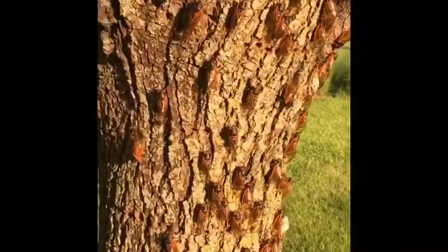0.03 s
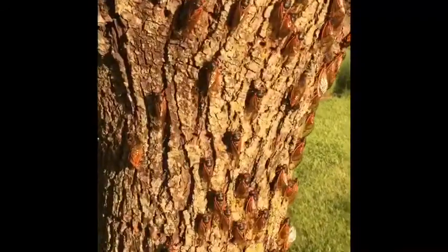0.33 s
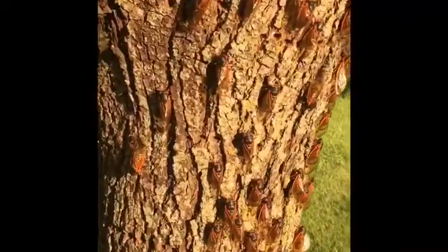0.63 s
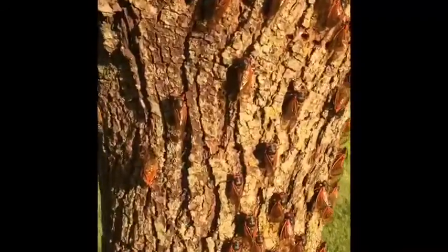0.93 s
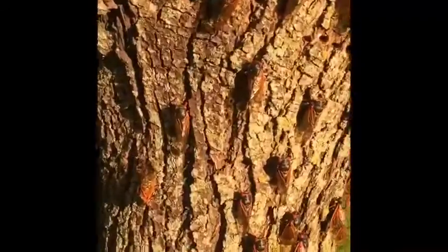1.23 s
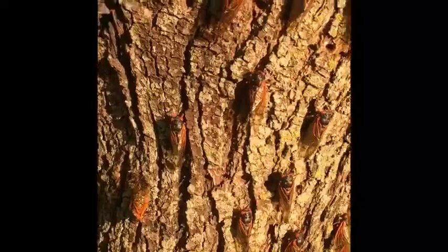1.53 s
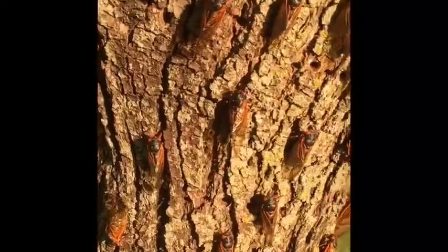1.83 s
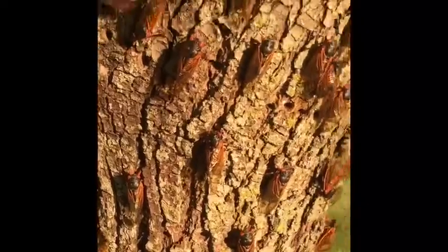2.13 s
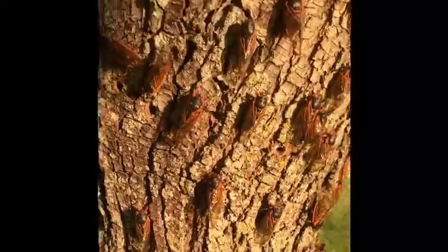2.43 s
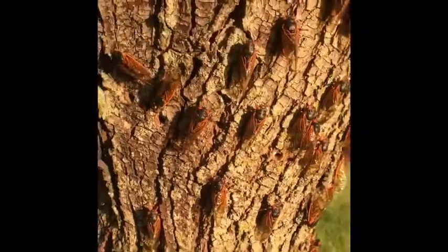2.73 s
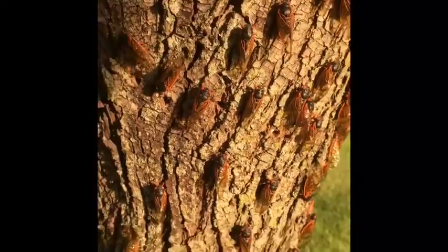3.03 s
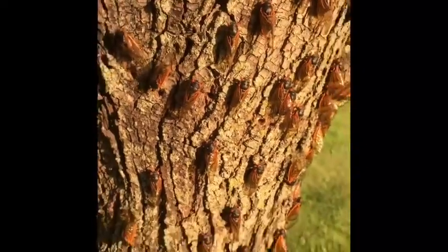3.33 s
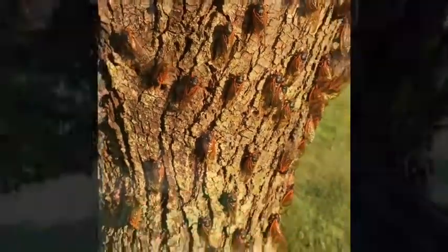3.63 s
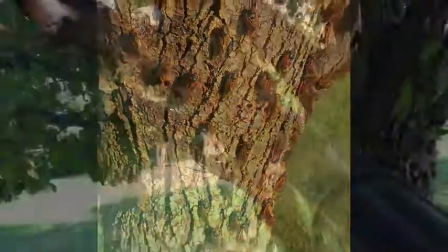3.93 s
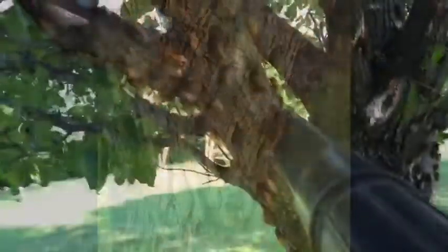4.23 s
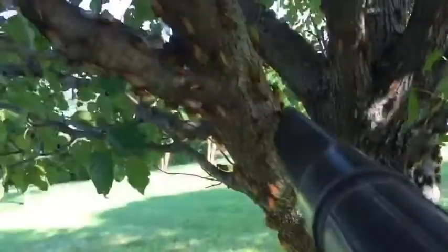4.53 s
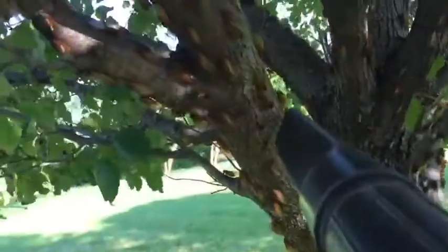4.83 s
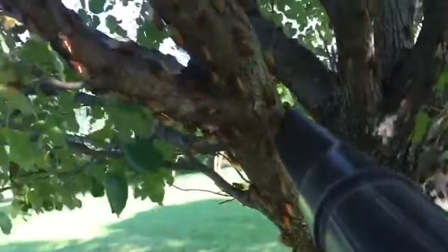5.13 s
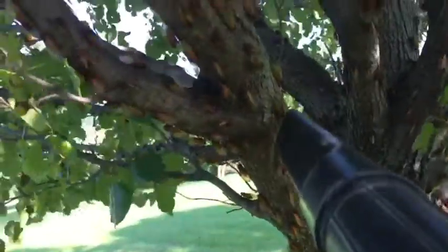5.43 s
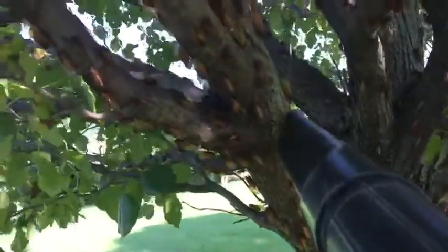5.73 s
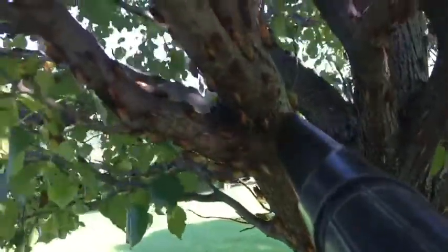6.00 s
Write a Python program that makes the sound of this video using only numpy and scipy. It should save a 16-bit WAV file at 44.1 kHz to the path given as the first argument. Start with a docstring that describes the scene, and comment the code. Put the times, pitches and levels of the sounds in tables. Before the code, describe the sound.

Quiet, rapid cicada chirps and light wind give way to a loud rushing vacuum whose nozzle chokes, whistles and clicks on debris.

```python
"""A far cicada chorus hisses, a breeze rumbles on the microphone and a bird peeps faintly.
A near cicada chirps about five times a second, its tymbal ribs buckling and ringing its hollow body;
neighbours tick and buzz. From 3.5 s a shop vacuum takes over: air rushes through its plastic nozzle
over the motor's whine and hum. Insects and bark choke the mouth, which hisses and whistles,
and they rattle away down the tube. The sound is mono."""
import sys
import numpy as np
from scipy import signal
from scipy.fft import rfft, irfft, next_fast_len
from scipy.io import wavfile
from scipy.ndimage import map_coordinates

SR = 44100
rng = np.random.default_rng(int(sys.argv[2]) if len(sys.argv) > 2 else 0)


def master(y):
    """Save y as 16-bit WAV."""
    cut = np.clip(np.atleast_2d(y).T, -1, 1)
    pcm = np.round(cut * 32767)  # scale
    wavfile.write(sys.argv[1], SR, pcm.astype(np.int16))


N = 267466
TIME = np.arange(N) / SR


def amp(db):
    """Decibels to gain."""
    return 10 ** (np.asarray(db) / 20)


def unit(x):
    """Scaled to rms 1."""
    return x / np.sqrt(np.mean(x ** 2) + 1e-20)


def curves(rows):
    """One value per sample for each column after the time."""
    times_s, *columns = np.transpose(rows)
    return [np.interp(TIME, times_s, column) for column in columns]


def wobble(rate_hz):
    """Smooth random curve, rate_hz knots a second."""
    return map_coordinates(rng.standard_normal(int(N * rate_hz / SR) + 4), [TIME * rate_hz])


def filtered(x, response):
    """Applies a complex frequency response."""
    size = next_fast_len(len(x) + 8192)
    return irfft(rfft(x, size) * response(np.fft.rfftfreq(size, 1 / SR)), size)[:len(x)]


def colour(points):
    """Response through (Hz, dB) points on a log axis."""
    points_hz, db = np.transpose(points)
    return lambda hz: amp(np.interp(np.log(hz + 1), np.log(points_hz + 1), db))


def resonances(modes):
    """Response of (Hz, width Hz, dB) modes, alternating in sign."""
    return lambda f: sum((-1) ** k * amp(db) * 1j * f * width / (hz * hz - f * f + 1j * f * width)
                         for k, (hz, width, db) in enumerate(modes))


def causal(response, size=2048):
    """Minimum-phase impulse response: nothing rings before it is struck."""
    cepstrum = irfft(np.log(np.abs(response(np.fft.rfftfreq(size, 1 / SR))) + 1e-6))
    cepstrum[1:size // 2] *= 2
    cepstrum[size // 2 + 1:] = 0
    return irfft(np.exp(rfft(cepstrum)))[:size // 4]


def noise(response):
    """Coloured noise of rms 1."""
    return unit(filtered(rng.standard_normal(N), response))


def band_noise(hz, width_hz):
    """Noise passed twice through one resonance."""
    return noise(lambda f: resonances([(hz, width_hz, 0)])(f) ** 2)


def add(track, start_s, sound):
    """Mixes a sound into the track."""
    start = int(np.clip(round(start_s * SR), 0, N))
    track[start:start + len(sound)] += sound[:N - start]


def gate(t, length_s, attack_s, release_s):
    """Opens at t = 0, holds, dies away."""
    return (1 - np.exp(-t / attack_s)) * np.exp(-np.maximum(t - length_s, 0) / release_s)


def swells(rows, sigma_s):
    """A bell-shaped bump of gain at each (s, dB)."""
    return sum(amp(db) * np.exp(-.5 * ((TIME - centre_s) / sigma_s) ** 2) for centre_s, db in rows)


def glides(notes, hoarse, fade_db=-3):
    """Breathy sliding tones; hoarse sets bandwidth as a share of pitch."""
    out, t = np.zeros(N), np.arange(SR // 4) / SR
    for start_s, length_s, db, first_hz, target_hz, slide_s in notes:
        hz = target_hz + (first_hz - target_hz) * np.exp(-t / slide_s)
        narrow = lambda f: 1 / (1 + 1j * f / (hoarse * target_hz)) ** 1.67
        real, imaginary = (unit(filtered(rng.standard_normal(len(t)), narrow)) for _ in range(2))
        tone = np.real((real + 1j * imaginary) * np.exp(2j * np.pi * np.cumsum(hz) / SR))
        add(out, start_s, amp(db + fade_db * t / length_s) * gate(t, length_s, .00044, .0088) * tone)
    return out


def ticks(rows, spectrum, gain_db, decay_s):
    """A fast-dying puff of coloured noise at each (s, dB)."""
    out, t = np.zeros(N), np.arange(SR // 40) / SR
    for start_s, db in rows:
        puff = unit(filtered(rng.standard_normal(len(t)), colour(spectrum)))
        add(out, start_s, amp(db + gain_db) * np.exp(-t / decay_s) * puff)
    return out


# Chorus loudness. Each row: time in seconds, hiss level in dB, drone level in dB.
CHORUS_LEVELS = [(0.0, -60.5, -67), (0.21, -61.5, -67), (0.52, -61, -61), (0.7, -60.5, -52),
                 (1.08, -58.5, -73), (2.12, -57, -67.5), (2.33, -56.5, -55), (3.41, -56.5, -58.5),
                 (3.45, -56, -53)]
# Its hiss. Each row: frequency in Hz, gain in dB.
CHORUS_SPECTRUM = [(530, 2), (900, -8.5), (1480, -3), (2150, -4.5), (3400, -4), (4730, -4.5), (5510, -3.5),
                   (7320, -6), (8130, -11.5), (15000, -22.5)]

def chorus():
    """Countless far cicadas merge into a hiss and a fluttering drone."""
    hiss_db, drone_db = curves(CHORUS_LEVELS)
    hiss = amp(hiss_db + 2 + .43 * wobble(20)) * noise(colour(CHORUS_SPECTRUM))
    drone = band_noise(hz=6600, width_hz=1100)
    return hiss + amp(drone_db - 4 + 6 * wobble(45)) * drone


# Breeze strength and single eddies. Each row: time in seconds, level in dB.
BREEZE_LEVELS = [(0.0, -38.5), (0.37, -46.5), (0.43, -50.5), (0.92, -46), (1.01, -67), (1.18, -55),
                 (1.22, -51.5), (1.53, -43.5), (1.57, -61), (1.63, -42.5), (1.74, -48), (1.8, -43),
                 (1.98, -51), (2.31, -39), (2.36, -50), (2.43, -43.5), (2.9, -49.5), (2.93, -71),
                 (2.97, -49), (3.16, -58), (3.22, -47), (3.29, -58), (3.48, -54)]
BREEZE_EDDIES = [(0.074, -33), (0.26, -36), (0.318, -35), (0.699, -44.5), (0.874, -39), (0.926, -37),
                 (1.387, -41), (1.469, -44), (1.659, -39.5), (1.797, -34), (2.208, -32), (2.292, -33),
                 (2.619, -39)]
# Their spectra. Each row: frequency in Hz, gain in dB.
BREEZE_SPECTRUM = [(20, -20), (45, -8.5), (80, 2.5), (150, 0.5), (300, -9), (600, -22), (1100, -41),
                   (2000, -56)]
EDDY_SPECTRUM = [(60, -16), (160, 10), (320, 5), (600, -2.5), (1000, -20), (2000, -50)]

def breeze():
    """Moving air rumbles on the microphone; single eddies flutter higher up."""
    rumble_db = curves(BREEZE_LEVELS)[0] - 1 + 5 * np.tanh(wobble(45))
    rumble = amp(rumble_db) * noise(colour(BREEZE_SPECTRUM))
    eddy_gain = swells(BREEZE_EDDIES, sigma_s=.013) * amp(-6 + 4 * np.tanh(wobble(90)))
    return rumble + eddy_gain * noise(colour(EDDY_SPECTRUM))


# Bird notes. Each row: start and length in seconds, level in dB, first and target pitch in Hz,
# slide time constant in seconds.
BIRD_NOTES = [(.03, 0.068, -66, 7400, 8100, 0.072), (1.015, .035, -60, 7100, 7800, 0.033)]

def far_bird():
    """A far bird peeps thin rising notes."""
    return glides(BIRD_NOTES, hoarse=.008)


def tymbal(body, rib_gap_s=.00064, rib_count=6):
    """One click of energy 1: ribs buckle in turn and ring the hollow body."""
    t = np.arange(SR // 50) / SR
    push = .075 * rng.standard_normal(len(t)) * np.exp(-t / .005)
    ribs = np.arange(rib_count)
    buckle_s = np.abs(ribs + rng.normal(0, .15, rib_count)) * rib_gap_s
    push[(buckle_s * SR).astype(int)] += amp(-2.2 * np.abs(ribs - 1))  # second rib loudest
    click = np.convolve(push, body)
    return click / np.linalg.norm(click)


# Near chirps. Each row: start in seconds, level in dB, click period and weak-click delay in seconds.
CICADA_CHIRPS = [(0.1812, -35.5, 0.0047, 0.044), (0.4316, -34, 0.0043, 0.036),
                 (0.8279, -32.5, 0.0057, 0.052), (1.07, -31.5, 0.0052, 0.047), (1.297, -32, 0.0055, 0.048),
                 (1.484, -33, 0.0055, 0.038), (1.7004, -32, 0.0046, 0.049), (1.8904, -30, 0.0058, 0.046),
                 (2.1029, -30, 0.0058, 0.052), (2.3126, -30.5, 0.006, 0.044),
                 (2.5296, -32.5, 0.0052, 0.047), (2.7245, -32, 0.0062, 0.049), (2.9452, -31, 0.0055, 0.054),
                 (3.1636, -34, 0.0061, 0.047), (3.3724, -34, 0.0051, 0.047)]
# The five clicks of a chirp. Each entry: gain in dB.
CLICK_GAINS_DB = [-8, -2, -3.5, -0.5, -3.5]
# Abdomen resonances. Each row: centre in Hz, width in Hz, gain in dB.
ABDOMEN_MODES = [(4570, 590, -8.5), (6050, 570, -4.5), (6530, 290, 1), (8980, 1300, -22.5)]

def near_cicada(gain_db=20.5, weak_db=-11, fade_db=2):
    """Each chirp is five clicks; four weaker, duller ones follow as the tymbals relax."""
    out = np.zeros(N)
    crack = colour([(1000, -20), (3000, -6), (9000, -6.5), (15000, -15)])
    band = lambda hz: 1 / (1 + (3600 / (hz + 1)) ** 8) / (1 + (hz / 11500) ** 6)
    body = causal(lambda hz: np.abs(resonances(ABDOMEN_MODES)(hz)) * band(hz) + amp(-32) * crack(hz))
    dull = causal(colour([(2500, -31), (4300, 1.5), (5500, 6), (6700, 1.5), (8000, -8.5), (13000, -27)]))
    for start_s, db, period_s, delay_s in CICADA_CHIRPS:
        for k, click_db in enumerate(CLICK_GAINS_DB):
            click_s = start_s + k * period_s + rng.normal(0, .0002)
            add(out, click_s, amp(db + gain_db + click_db + rng.normal(0, 1)) * tymbal(body))
        for k in range(4):
            click_s = start_s + delay_s + k * period_s + rng.normal(0, .00046)
            add(out, click_s, amp(db + gain_db + weak_db - fade_db * k) * tymbal(dull))
    return out


# Snaps. Each row: start in seconds, level in dB.
CHIRP_SNAPS = [(.184, -38.5), (1.304, -44), (2.121, -38), (2.533, -42)]
# Their spectrum. Each row: frequency in Hz, gain in dB.
SNAP_SPECTRUM = [(800, -12), (2400, 1), (4500, 4), (9000, -5), (15000, -13)]

def snaps():
    """A dry snap sounds within some chirps."""
    return ticks(CHIRP_SNAPS, SNAP_SPECTRUM, gain_db=-2, decay_s=.0027)


# Neighbours' calls. Each row: start and length in seconds, level and swell in dB, click rate in Hz.
NEIGHBOUR_BUZZES = [(.339, .005, -42.5, 1, 200), (.566, .206, -38.5, 4, 480), (0.668, .015, -43.5, -5, 190),
                    (0.942, .012, -56, 7, 170), (1.042, .012, -52, 2, 190), (1.509, 0.036, -57, -8, 320),
                    (1.603, .034, -43, 0, 156), (1.831, .005, -55.5, -4, 210), (2.423, .005, -49, 1, 190),
                    (2.678, .005, -53.5, -4, 190), (3.454, .005, -48, 2, 220)]
# Their body response. Each row: frequency in Hz, gain in dB.
NEIGHBOUR_SPECTRUM = [(1760, -62), (3000, -38), (3830, -29), (4190, -11), (4360, -7), (4900, -7),
                      (6420, 0.5), (6800, -1), (8150, -14.5), (9150, -15), (12100, -32), (14000, -33)]

def neighbours():
    """Other cicadas on the trunk tick or run their clicks together into a buzz."""
    out, body = np.zeros(N), causal(colour(NEIGHBOUR_SPECTRUM))
    for start_s, length_s, db, swell_db, rate_hz in NEIGHBOUR_BUZZES:
        for t in np.arange(0, length_s, 1 / rate_hz):
            gain = amp(db + swell_db * (t / length_s - 1.5) + rng.normal(0, .68)) * np.sqrt(SR / rate_hz)
            add(out, start_s + t + rng.normal(0, .00039), gain * tymbal(body))
    return out


def garden(calls, t60_s=.068, wet_db=-16):
    """Branches and ground scatter a short, weak tail."""
    t = np.arange(SR // 3) / SR
    tail = rng.standard_normal(len(t)) * amp(-60 * t / t60_s) * (1 - np.exp(-t / .0039))
    return calls + amp(wet_db) * signal.fftconvolve(calls, tail / np.linalg.norm(tail))[:N]


# Vacuum airflow. Each row: time in seconds, tube rush level in dB, mouth hiss level in dB.
FLOW_LEVELS = [(3.5, -48, -37), (3.59, -44.5, -39), (3.74, -37.5, -29.5), (3.86, -35, -26.5),
               (4.3, -32.5, -24.5), (4.38, -30, -29), (4.75, -29, -24.5), (5.08, -27, -27),
               (5.22, -29, -24.5), (5.37, -29.5, -27), (6.06, -27, -24.5)]
# Resonances of the short end piece and long tube. Each row: centre and nominal width in Hz, gain in dB.
NOZZLE_MODES = [(1313, 190, 2.5), (1960, 170, 2), (2480, 120, -2), (3060, 250, -1), (3640, 740, -1)]
TUBE_MODES = [(333, 102, 0), (582, 88, 1.5), (993, 78, -1), (1213, 120, 1), (1403, 157, 5),
              (1954, 173, 4.5), (2144, 154, 1), (2600, 200, -2.5), (2900, 320, -4), (3640, 340, -7)]
# Mouth hiss. Each row: frequency in Hz, gain in dB.
MOUTH_SPECTRUM = [(400, 2), (2500, -0.5), (4200, 0), (4900, -1), (5800, 0.5), (8000, -1.5), (9300, 0),
                  (10400, -3.5), (11500, -1), (15000, -2)]

def suction():
    """Steady flow sounds the resonances of nozzle and tube and hisses at the mouth."""
    rush_db, mouth_db = curves(FLOW_LEVELS)
    # each resonance flutters on its own as the flow shifts
    nozzle = unit(sum(amp(db - .5 * wobble(22.15)) * np.sqrt(width_hz) * band_noise(hz, 1.5 * width_hz)
                      for hz, width_hz, db in NOZZLE_MODES))
    turn_rad = np.interp(TIME, [4.1, 4.9], [.45, np.pi / 2])  # nozzle swings away, tube takes over
    tube = noise(resonances(TUBE_MODES))
    hollow = amp(1.5) * np.sin(turn_rad) * tube + amp(5) * np.cos(turn_rad) * nozzle
    rush = amp(rush_db + .5 * wobble(28)) * hollow
    hiss = amp(mouth_db + .65 * wobble(60)) * noise(colour(MOUTH_SPECTRUM))
    return rush + hiss


# Draught strength and eddies from the nozzle. Each row: time in seconds, level in dB.
DRAUGHT_LEVELS = [(3.5, -51), (3.58, -40.5), (3.92, -32.5), (4.06, -23), (4.11, -30.5), (4.17, -19.5),
                  (4.22, -48), (4.27, -24.5), (4.42, -35), (4.48, -16.5), (4.53, -27), (4.93, -27.5),
                  (4.98, -18.5), (5.05, -38), (5.12, -24), (5.31, -39), (5.47, -27), (5.75, -36),
                  (5.85, -26.5), (6.06, -35)]
NOZZLE_EDDIES = [(4.049, -23), (4.689, -19), (4.958, -19), (5.479, -20), (5.589, -14.5)]
# Their spectrum. Each row: frequency in Hz, gain in dB.
DRAUGHT_SPECTRUM = [(13, -47), (22, -33), (50, -4), (69, 2.5), (167, -3.5), (228, -8.5), (462, -22.5),
                    (500, -35.5), (650, -16), (1100, -120)]

def draught():
    """Air drawn past the microphone rumbles and thumps on it."""
    rumble_gain = amp(curves(DRAUGHT_LEVELS)[0] - 2.5 + 2.5 * np.tanh(wobble(30)))
    thump_gain = amp(-9) * swells(NOZZLE_EDDIES, sigma_s=.0088)
    return (rumble_gain + thump_gain) * noise(colour(DRAUGHT_SPECTRUM))


# Hum and whine. Each row: frequency in Hz, relative level in dB.
MOTOR_TONES = [(65, -9.5), (164, -10.5), (560, -15), (1008, -26), (2270, -8), (2676, -28)]

def motor(speed_drift=.000746, waver_db=2):
    """The motor hums and the impeller whines, growing clearer as the nozzle turns."""
    drifted_s = np.cumsum(1 + speed_drift * wobble(8)) / SR
    tones = sum(amp(db + waver_db * wobble(27)) * np.sqrt(2) * np.sin(2 * np.pi * hz * drifted_s)
                for hz, db in MOTOR_TONES)
    rush_db = curves(FLOW_LEVELS)[0]
    return amp(rush_db + np.interp(TIME, [4.3, 5.0], [-8, 0])) * tones


# Blockages. Each row: start and length in seconds, jet level, roar level and level change in dB.
BLOCKAGES = [(4.202, 0.012, -10, -22, -8), (4.218, 0.047, -17.5, -22, -4),
             (4.269, 0.047, -28.5, -33.5, 4.5), (4.320, 0.079, -21.5, -26.5, 1.5),
             (4.399, 0.051, -22, -29.5, 8.5), (4.454, 0.087, -17.5, -17.5, 0), (4.610, 0.04, -22, -31, -5),
             (4.675, .14, -24, -31, 1), (5.022, 0.11, -14, -33, -7), (5.181, 0.0077, -16, -19.5, -3.5),
             (5.217, 0.18, -17.5, -17, -2), (5.697, 0.041, -12.5, -18, -6.5)]
# Jet and roar spectra. Each row: frequency in Hz, gain in dB.
JET_SPECTRUM = [(800, -4.5), (2000, -3.5), (3300, 5), (4900, 0.5), (7600, -1.5), (9300, 1.5), (10400, -2),
                (11800, 2.5), (15000, -1.5)]
ROAR_SPECTRUM = [(200, -25), (600, -3.5), (1300, 0), (2000, 1.5), (2600, -4), (4000, -6), (6500, -17),
                 (12000, -30)]

def chokes(rough_db=2.04, grit_db=3, pipe_hz=635, echo_gain=.095):
    """A partly blocked mouth makes a hissing jet; the load tumbling down the tube roars roughly."""
    jet_gain, roar_gain = np.zeros(N), np.zeros(N)
    t = np.arange(SR // 3) / SR
    for start_s, length_s, jet_db, roar_db, change_db in BLOCKAGES:
        shape = gate(t, length_s, .0019, .011) * amp(change_db * np.minimum(t / length_s, 1))
        add(jet_gain, start_s, amp(jet_db) * shape)
        add(roar_gain, start_s, amp(roar_db) * shape)
    tumble = unit(amp(rough_db * wobble(260)))
    # sound bouncing back and forth along the tube makes the roar hollow
    hollow = lambda hz: colour(ROAR_SPECTRUM)(hz) / (1 - echo_gain * np.exp(-2j * np.pi * hz / pipe_hz))
    grit = unit(filtered(amp(grit_db * wobble(900)) * rng.standard_normal(N), hollow))
    jet = jet_gain * np.sqrt(tumble) * noise(colour(JET_SPECTRUM))
    return jet + roar_gain * tumble * grit


# Gap whistles. Each row: start and length in seconds, level in dB, first and target pitch in Hz,
# slide time constant in seconds.
GAP_WHISTLES = [(4.205, 0.032, -18.5, 3590, 2905, .006), (4.232, 0.044, -20.5, 1400, 1204, 0.0078),
                (4.318, 0.062, -24, 3120, 2780, 0.0444), (4.401, .006, -14.5, 5520, 2800, .004),
                (4.407, .085, -20, 1350, 989, 0.056), (4.445, 0.078, -21.5, 2523, 1810, 0.0097),
                (5.027, 0.059, -24, 3400, 3200, .04), (5.08, 0.073, -23, 2850, 2670, .025),
                (5.695, 0.035, -20.5, 3983, 1409, 0.0053)]

def whistles():
    """The narrowed gap whistles hoarsely, sliding down."""
    return glides(GAP_WHISTLES, hoarse=.068)


# Debris impacts. Each row: start in seconds, level in dB.
DEBRIS_HITS = [(4.61, -6), (5.0175, 1.5), (5.1827, -3), (5.218, 2.5), (5.2351, 0), (5.2637, 2), (5.288, 0),
               (5.3186, 2), (5.3668, 0), (5.6972, -1)]
# Struck plastic. Each row: frequency in Hz, gain in dB.
PLASTIC_SPECTRUM = [(300, -6), (1400, 4), (3500, 2), (6000, -8), (12000, 3), (15000, 1)]

def debris():
    """Hard bits strike the plastic tube."""
    return ticks(DEBRIS_HITS, PLASTIC_SPECTRUM, gain_db=-8, decay_s=.0018)


def scene():
    """The outdoor sounds fade out while the vacuum fades in."""
    calls = near_cicada() + snaps() + neighbours() + far_bird()
    outdoors = garden(calls) + chorus() + breeze()
    vacuum = suction() + draught() + motor() + chokes() + whistles() + debris()
    mono = outdoors * np.interp(TIME, [3.5, 4.4], [1, 0]) + vacuum * np.interp(TIME, [3.49, 3.6], [0, 1])
    return np.array([mono, mono])


def record(dry):
    """Soft peak limiting, then a steep low-pass."""
    ceiling, cutoff_hz = .9, 15350
    rounded = dry / (1 + np.abs(dry / ceiling) ** 6) ** (1 / 6)
    low_pass = lambda hz: 1 / (1 + (hz / cutoff_hz) ** 200)
    return np.array([filtered(channel, low_pass) for channel in rounded])


dry = scene()
out = record(dry)
master(out)
```